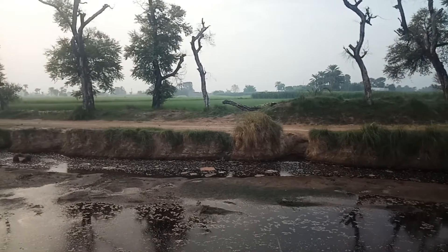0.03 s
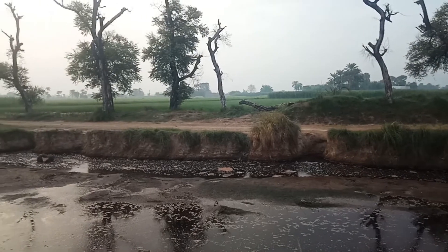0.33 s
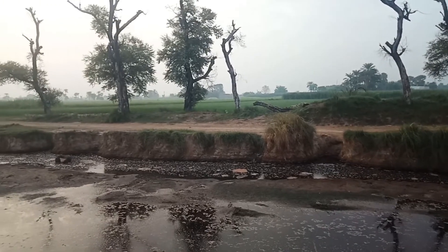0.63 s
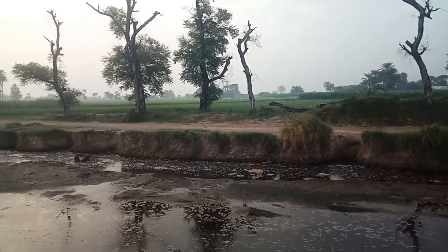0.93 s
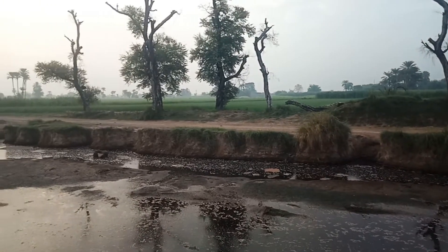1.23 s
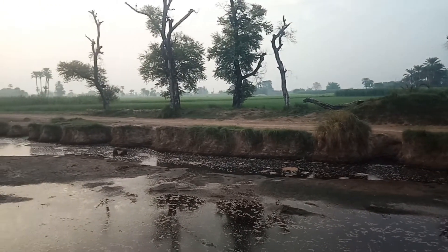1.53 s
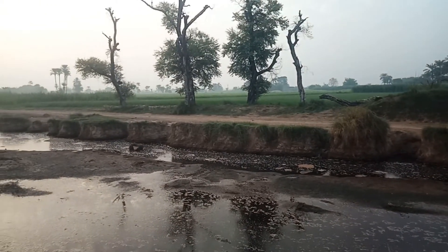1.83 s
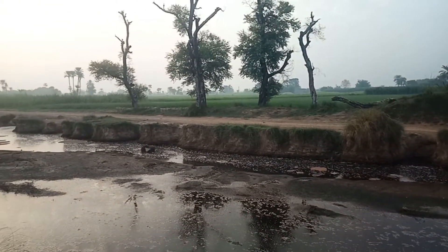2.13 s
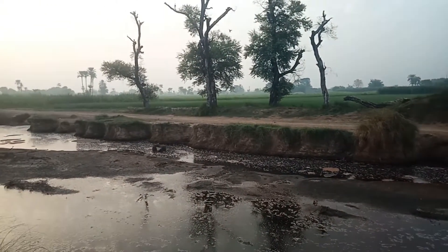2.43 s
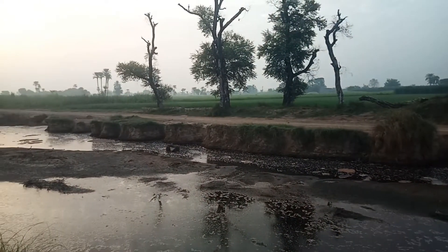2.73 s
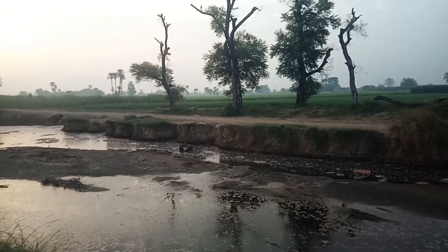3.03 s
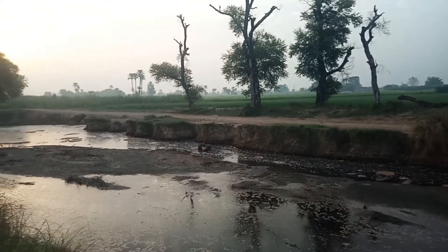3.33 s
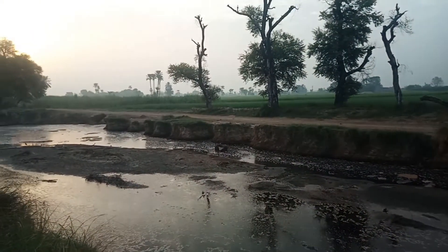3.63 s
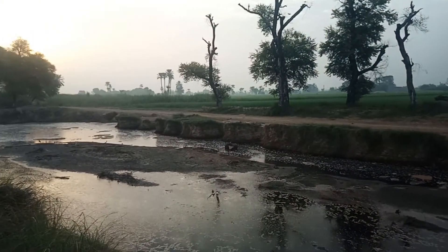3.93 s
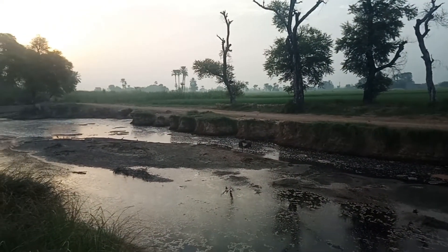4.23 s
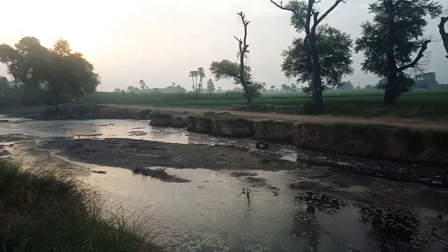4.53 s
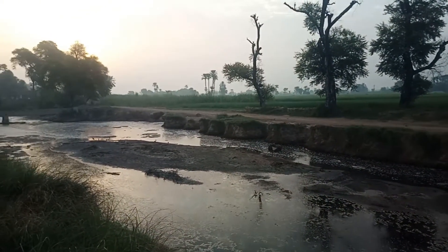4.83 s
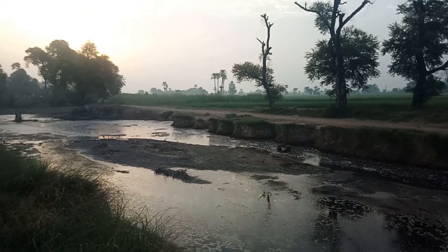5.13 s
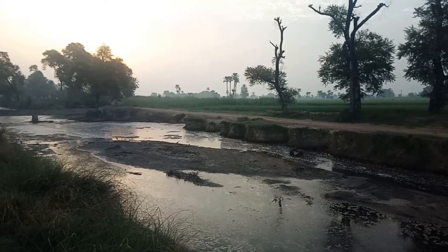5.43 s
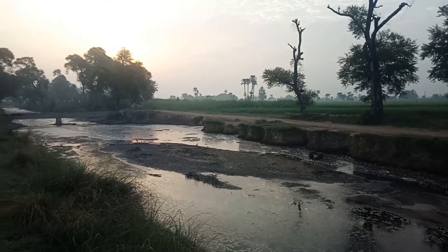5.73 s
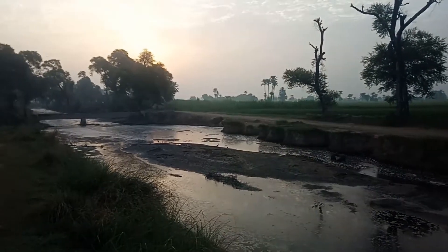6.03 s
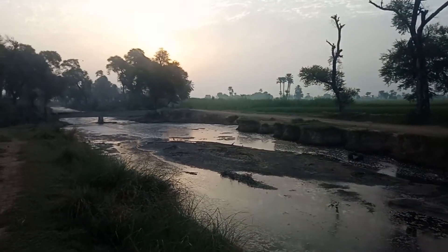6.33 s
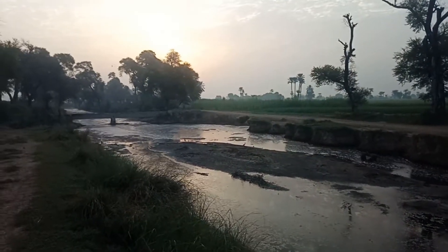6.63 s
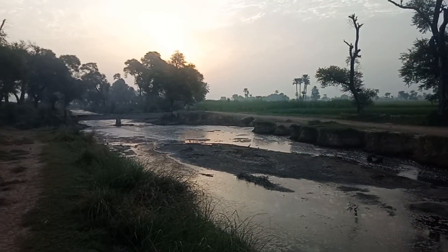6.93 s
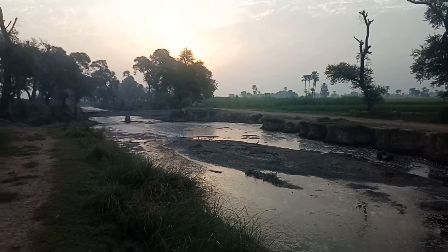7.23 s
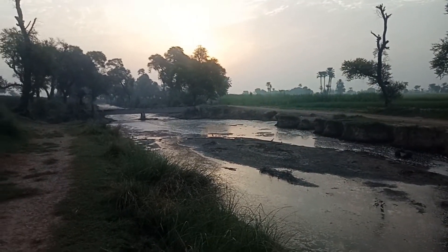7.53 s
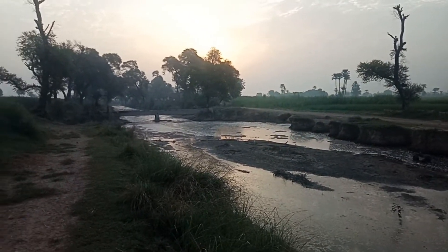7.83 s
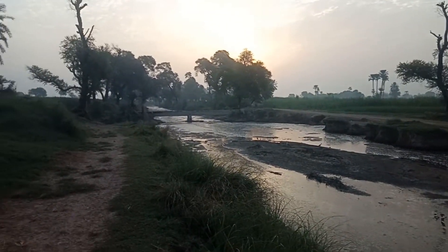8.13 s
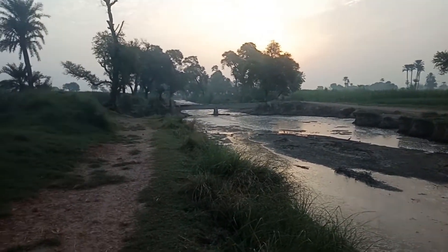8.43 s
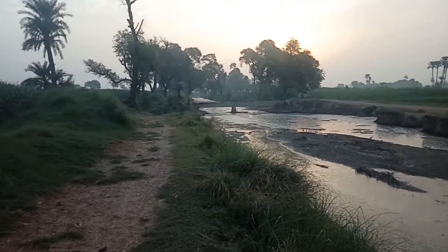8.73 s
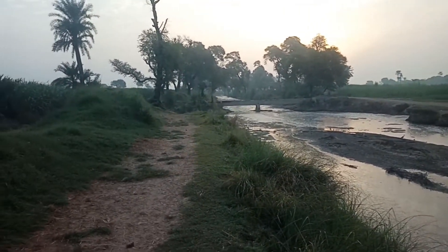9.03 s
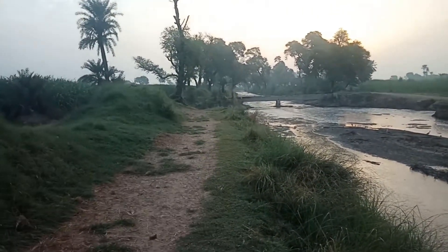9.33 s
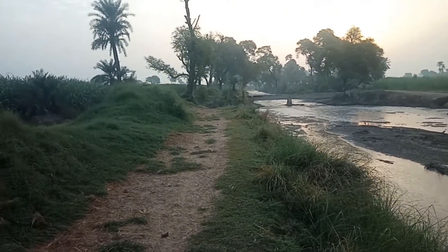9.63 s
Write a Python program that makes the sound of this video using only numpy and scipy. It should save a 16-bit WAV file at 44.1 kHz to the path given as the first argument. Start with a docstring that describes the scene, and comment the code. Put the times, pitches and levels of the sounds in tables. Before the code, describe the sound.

Small birds chirp in quiet farmland by a faintly trickling stream as two crows, one close and one distant, trade raspy caws.

```python
"""A crow caws hoarsely close to the microphone, and another answers from further off: dawn beside a
slow stream in open farmland. Each caw is a fluttering syrinx heard through the throat. Mynas whistle
and small birds chirp in the trees; bank and branches scatter the calls back. Behind them lie far
chatter and hoots, bubbles in the shallows, a low regular thud and a soft country hush.
One microphone takes it all, and the recorder's noise suppressor turns it down when the birds pause."""
import sys
import numpy as np
from scipy import signal
from scipy.fft import rfft, irfft
from scipy.io import wavfile
from scipy.ndimage import uniform_filter1d

SR = 44100
rng = np.random.default_rng(int(sys.argv[2]) if len(sys.argv) > 2 else 0)


def materialize(psi):
    """Save the field psi as 16-bit PCM at rate SR to the path in sys.argv[1].

    A 1-D psi becomes a single channel; in a 2-D psi each row is a channel.
    """
    bounded = np.clip(np.atleast_2d(psi).T, -1, 1)
    quanta = np.round(bounded * 32767).astype(np.int16)
    wavfile.write(sys.argv[1], SR, quanta)


N = 436149
TIME = np.arange(N) / SR

# caws of the crow by the microphone and of the one further off:
# (time [s], length [s], pitch [Hz], throat brightness [ratio], level [dB], windpipe gain [dB])
NEAR_CROW_CAWS = [(-.185, 0.31, 418, 0.97, -40.5, -25), (4.01, .31, 427.7, 1.062, -32.5, -22.5),
                  (4.866, 0.31, 414.5, 1.008, -32.5, -18), (5.604, 0.31, 421, 1.027, -32, -20)]
FAR_CROW_CAWS = [(.36, 0.3, 448.6, 1.08, -59, -32), (.815, 0.48, 448.8, 1.077, -38.5, -43),
                 (3.47, 0.45, 444.8, 1.063, -40, -29), (4.5, 0.46, 435.2, 1.066, -43, -28),
                 (6.26, 0.44, 438.2, 1.1, -41.5, -20.5), (7.02, .11, 442, 1.11, -40.5, -23),
                 (7.19, 0.087, 427.6, 1.03, -46, -24), (7.775, .22, 434.6, 1.06, -48, -39)]
# course of one caw: (position [share of length], pitch [ratio], beak opening [ratio], gain [dB],
# flutter depth [factor], raggedness [0-1])
NEAR_CAW_COURSE = [(0, .78, .76, -33, 0.7, 0.91), (0.102, .87, 0.8, -11.5, 1, 0.93),
                   (0.219, .94, 0.93, -2.5, 1.2, 0.7), (.36, 0.97, 0.97, -0.5, 1.2, 0.4),
                   (.52, 1, 0.98, 0.5, 1.1, 0), (0.701, 0.92, 0.95, -2, 1.07, 0.5),
                   (.82, .92, 0.97, -2, 0.92, .15), (.89, .76, 0.88, -11, 0.5, 0.2),
                   (1, 0.5, 0.58, -37.5, 0, 0.6)]
FAR_CAW_COURSE = [(0, .88, .92, -24, 1, .9), (.08, .95, .97, -8.5, 1, .5), (.2, 1.06, 1, -4, 1, .1),
                  (.45, 1.05, 0.88, -5.5, 1, 0.11), (.75, .93, .98, -5, 1, .2),
                  (.88, 0.88, .96, -10, 1, 0.55), (0.999, 0.7, 0.93, -16, 0.93, 0.42)]
# crow's throat resonances, which move with the beak opening: (frequency [Hz], gain [dB])
THROAT_RESPONSE = [(380, -38), (600, -29), (830, -19.5), (1040, -16), (1270, -10.5), (1480, -11.5),
                   (1800, 3.5), (2020, 3), (2280, -6), (2750, -33), (3600, -65.5), (6000, -90)]
# steady upper resonance of its windpipe: (frequency [Hz], gain [dB])
WINDPIPE_RESPONSE = [(2000, -50), (2900, -14), (3400, -13), (4050, 0), (4450, -3), (5000, -21), (5800, -31),
                     (7000, -41), (14000, -49)]
# sagging and rising myna notes: (time [s], length [s], pitch [Hz], level [dB], trill depth [0-1])
MYNA_SAGGING_NOTES = [(.875, 0.097, 1385, -52.5, .64), (1.055, 0.27, 1274, -48.5, .15),
                      (1.375, 0.062, 1123, -51, 0.3), (1.566, 0.06, 1225, -54, 0.1),
                      (2.123, 0.026, 1345, -45, .1), (2.152, 0.052, 1310, -41.5, 0),
                      (2.313, 0.1, 1255, -46.5, 0.57), (2.41, 0.13, 1110, -56, 1),
                      (2.735, 0.06, 1380, -53.5, 0), (2.852, .11, 1320, -58, 0.28),
                      (4.445, .089, 1398, -45, 0.17), (4.619, 0.11, 1324, -51.5, 0.2),
                      (6.49, .13, 1343, -60.5, 0.71), (8.025, 0.089, 1266, -57.5, .6),
                      (8.17, 0.064, 1426, -54, 0.24), (8.289, 0.121, 1350, -53, 0.43),
                      (8.559, 0.071, 1214, -51, 0.5), (8.71, 0.027, 1154, -53, .1),
                      (9.722, 0.022, 1242, -49.5, 0.4)]
MYNA_RISING_NOTES = [(2.204, 0.062, 1307, -61.5, .3), (2.65, .09, 1314, -55.5, 0.051),
                     (2.783, 0.054, 1299, -43.5, 0.12), (2.814, 0.036, 1391, -40.5, 0.28),
                     (7.133, .085, 1277, -53, 0.18), (7.269, 0.0398, 1254, -47.5, 0.37),
                     (7.3, .045, 1476, -45, .3), (8.397, .08, 1394, -51, .5)]
# small birds in the trees, by kind of call: (time [s], length [s], pitch [Hz], level [dB])
SMALL_BIRD_CALLS = { "slur": [(.113, 0.084, 3816, -56), (.275, .06, 3524, -54), (.732, .035, 3080, -52.5),
                    (.874, .1, 4060, -55.5), (1, .075, 3930, -49.5), (1.41, .035, 3000, -55),
                    (1.825, .052, 2995, -56), (1.878, .068, 3170, -57), (2.82, 0.057, 4140, -58),
                    (3.02, 0.074, 4050, -52), (3.26, .07, 4050, -56), (3.384, .035, 3235, -51.5),
                    (3.489, .095, 3890, -58.5), (3.604, .031, 3575, -53), (3.661, .035, 5060, -54),
                    (3.73, .11, 3880, -55), (3.836, .05, 5120, -56), (3.966, .094, 3840, -60.5),
                    (4.23, 0.054, 3730, -52.5), (4.371, .054, 3900, -57.5), (5.22, .15, 3500, -68)],
                    "fall": [(.932, 0.028, 2570, -45), (.316, .017, 3300, -53), (1.455, 0.03, 3400, -56),
                    (2.398, .064, 3307, -54.5), (3.433, 0.031, 3190, -52), (3.552, 0.037, 3170, -52.5),
                    (3.784, 0.026, 3366, -51), (8.168, .063, 5130, -63), (8.532, .098, 3590, -61),
                    (9.025, 0.13, 3300, -66), (9.444, .09, 3980, -69), (9.744, 0.074, 2910, -56)],
                    "pip": [(.01, 0.04, 3060, -47), (1.186, .012, 3180, -43.5), (1.53, .036, 2896, -52.5),
                    (1.53, 0.053, 1350, -60), (2.672, 0.076, 5330, -65.5), (6.588, 0.017, 4760, -56.5),
                    (6.637, 0.028, 3810, -47.5), (6.735, 0.024, 3760, -49), (6.926, 0.0259, 3385, -43),
                    (6.961, 0.024, 3613, -46.5), (7.128, 0.099, 5026, -59), (7.845, 0.011, 3290, -57),
                    (7.902, 0.021, 3670, -58.5)], "scold": [(2.484, 0.038, 3250, -50.5),
                    (3.906, 0.07, 2606, -46), (3.976, 0.037, 2840, -43.5), (4.034, 0.057, 5550, -64.5),
                    (4.177, 0.052, 2677, -43), (4.254, 0.032, 2875, -45), (4.315, 0.036, 5010, -58.5),
                    (7.925, 0.019, 5060, -60.5), (8.216, .053, 2750, -50), (8.218, 0.078, 3980, -51),
                    (8.39, .08, 4230, -57.5), (8.433, 0.06, 5600, -65), (8.617, 0.15, 3165, -56),
                    (8.698, 0.078, 5560, -66.5)], "tweet": [(2.456, 0.027, 3170, -45.5),
                    (2.528, 0.027, 3140, -42), (6.661, 0.032, 3290, -44.5), (6.755, 0.028, 3244, -44),
                    (6.999, 0.037, 3332, -43.5), (7.979, 0.024, 3420, -48.5)],
                    "dive": [(2.9, 0.075, 3940, -49), (3.001, 0.061, 3900, -45.5), (3.1, 0.065, 4030, -48),
                    (3.221, 0.071, 3966, -50.5), (7.396, .06, 3877, -39), (7.486, 0.058, 3880, -40),
                    (7.584, .059, 3910, -42), (7.685, 0.049, 4160, -68)],
                    "squeak": [(9.689, .06, 3300, -43)]}
# strokes that make up each kind of call: (delay [call lengths], length [call lengths],
# start pitch [ratio], middle pitch [ratio], end pitch [ratio], gain [dB], rasp [0-1])
CALL_STROKES = {"slur": [(0, .72, 0.97, 1, 0.95, -0.89, .03), (.62, .4, 1, .93, .81, 0, .05)],
                "fall": [(0.0015, 1, 1, 0.96, .79, 0.011, 0.31)],
                "pip": [(0.0018, 0.93, .95, 0.99, 1.06, 0, 0.34)],
                "scold": [(0, 0.99, 0.94, 0.98, 1.01, 0, .9)], "tweet": [(0, 1, .74, 1.1, 1.25, -0.5, .3),
                (.9, 1.92, 1.18, 1.25, 1.27, -12, .55)], "dive": [(0, .3, 1.68, 1.58, 1.31, -30.5, 0.56),
                (.33, .36, 1.33, 1.18, .96, -7, 0.52), (.74, .24, 1.18, 1, .85, 0, 0.86),
                (.9, .6, 0.49, .99, .99, -10, .65)], "squeak": [(0, .65, .99, 1, 0.976, 1, 0.026),
                (.05, 0.96, .91, 1.01, .97, -7, 0.96), (.07, .75, .65, .64, .62, -22, .35),
                (.18, 1, 1.26, 1.2, 1.11, -15, .8)]}
# bouts of chatter in the far trees: (time [s], length [s], level [dB])
CHATTER_BOUTS = [(0, 0.64, -64.5), (0.802, .72, -61), (2.128, 1.11, -58), (3.419, 1.84, -60.5),
                 (5.222, 0.37, -68), (6.3, 1.42, -55.5), (7.821, .9, -58), (9.706, .18, -57.5)]
# hoots from across the fields: (time [s], length [s], pitch [Hz], level [dB])
FIELD_HOOTS = [(0, 0.56, 530, -70), (.95, .15, 526, -72), (5.15, 0.342, 541, -74), (7.093, 0.47, 550, -72)]
# pace of the low thuds: (time [s], rate [thuds/s])
THUD_RATE = [(0, 7.808), (1, 7.91), (2.5, 7.632), (3.5, 7.697), (5, 7.915), (7.5, 7.948), (9.9, 7.655)]
# hush of the open farmland: (frequency [Hz], relative density [dB])
HUSH_SPECTRUM = [(25, -20.5), (60, 5), (100, 5.5), (150, 1), (280, 2), (500, -5.5), (900, -3), (1500, -3),
                 (2500, -0.5), (4000, -11), (5200, -23.5), (7000, -28), (15000, -27)]
# recorder's noise suppressor: (level in the birds' band [dB], gain [dB])
SUPPRESSOR_CURVE = [(-63.5, -15.5), (-61.5, -9), (-57, -4.5), (-53.5, -1.12), (-41.5, 1), (-32, 3.5)]


def crow(caws, course, flutter_hz, swing, throb, jitter, rasp_db):
    """Syrinx harmonics pass the throat; a fast flutter in pitch and level makes the caw hoarse."""
    out = np.zeros(N)
    share, *columns = np.transpose(course)
    for start, length, pitch_hz, brightness, level_db, windpipe_db in caws:
        size = int(length * SR)
        position = np.linspace(0, 1, size)
        ratio, opening, course_db, depth, ragged = (np.interp(position, share, c) for c in columns)
        flutter = phase_of(flutter_hz * ratio * (1 + .04 * wander(60, size)))
        # the voice starts ragged, settles, and drops at the end
        wobble = 1 + depth * swing * np.sin(flutter) + ragged * jitter * wander(700, size)
        phase = phase_of(pitch_hz * ratio * wobble)
        # as the flutter dies the syrinx relaxes and low harmonics take over
        tilt = 3.7 * (1 - np.clip(depth, 0, 1))
        syrinx = sum((k / 4) ** -tilt * np.sin(k * phase + rng.uniform(0, 2 * np.pi))
                     for k in range(2, 26))
        rasp = from_db(rasp_db) * rng.standard_normal(size)
        voice = through_throat(syrinx + rasp, opening * brightness, windpipe_db)
        voice /= np.sqrt(uniform_filter1d(voice ** 2, size=500) + 1e-12)  # even out the level
        pulsing = 1 + depth * throb * np.cos(flutter)
        add(out, start, overblown(voice) * pulsing * from_db(level_db + course_db))
    return out


def through_throat(source, opening, windpipe_db):
    """The moving throat resonances and the steady windpipe one colour the voice."""
    hz, t, frames = signal.stft(source, SR, nperseg=512)
    scale = np.interp(t * SR, np.arange(len(source)), opening)
    throat = gain_at(THROAT_RESPONSE, hz[:, None] / scale)
    windpipe = from_db(windpipe_db) * gain_at(WINDPIPE_RESPONSE, hz[:, None])
    return signal.istft(frames * (throat + windpipe), SR)[1][:len(source)]


def overblown(voice, bite_db=-21):
    """A hard-driven voice doubles its main resonance an octave higher."""
    octave = band_pass(voice ** 2, 3300, 4700)
    return voice + from_db(bite_db) * rms_one(octave)


def mynas(notes, arc, harmonics_db, trill_hz, jitter):
    """Reedy notes led by the second harmonic, some trilled; arc is the start and end pitch ratio."""
    out = np.zeros(N)
    for start, length, pitch_hz, level_db, trill_depth in notes:
        hz, envelope = glide(length, arc[0] * pitch_hz, pitch_hz, arc[1] * pitch_hz, edge=.052)
        size = len(hz)
        phase = phase_of(hz * (1 + jitter * wander(400, size)))
        voice = sum(from_db(db) * treble_loss(k * hz) * np.sin(k * phase)
                    for k, db in enumerate(harmonics_db, start=1))
        trill = 1 + trill_depth * np.sin(phase_of(trill_hz * (1 + .2 * wander(45, size))))
        swell = .5 + np.hanning(size)
        waver = 1 + .18 * wander(180, size)
        add(out, start, from_db(level_db) * rms_one(voice * trill * swell * waver) * envelope)
    return out


def small_birds(rasp_swing, rasp_hz, octave_db):
    """Nearly pure sweeps from the trees; in raspy ones pitch and level shake irregularly."""
    out = np.zeros(N)
    for start, length, arc_hz, level_db, rasp in strokes():
        hz, envelope = glide(length, *arc_hz, edge=.12)
        phase = phase_of(hz * (1 + rasp * rasp_swing * wander(rasp_hz, len(hz))))
        tone = np.sin(phase) + from_db(octave_db) * np.sin(2 * phase)
        shake = 1 + .74 * rasp * wander(300, len(hz))
        add(out, start, from_db(level_db) * rms_one(tone * shake * treble_loss(hz)) * envelope)
    return out


def strokes():
    """Each small-bird call is its kind's strokes, stretched and transposed."""
    for kind, calls in SMALL_BIRD_CALLS.items():
        for start, length, hz, level_db in calls:
            for delay, share, first, middle, last, stroke_db, rasp in CALL_STROKES[kind]:
                arc_hz = (first * hz, middle * hz, last * hz)
                yield start + delay * length, share * length, arc_hz, level_db + stroke_db, rasp


def treble_loss(hz, corner_hz=4500, steepness=14):
    """High notes arrive dulled: air and microphone lose treble above about 4.5 kHz."""
    return 1 / np.sqrt(1 + np.abs(hz / corner_hz) ** steepness)


def far_flock(notes_per_s, spread_db):
    """Faint scratchy chatter from distant trees, in bouts of loosely spaced notes."""
    out = np.zeros(N)
    for start, bout_s, level_db in CHATTER_BOUTS:
        slots = np.arange(start, start + bout_s, 1 / notes_per_s)
        for slot, (late, length, pitch, slope, faintness) in zip(slots, rng.random((128, 5))):
            hz = 2100 + 2000 * pitch
            bend = .33 * (slope - .5)
            length_s = .018 + .04 * length
            arc, envelope = glide(length_s, hz * (1 - bend), hz * 1.03, hz * (1 + bend), edge=.4)
            tone = np.sin(phase_of(arc * (1 + .025 * wander(600, len(arc)))))
            add(out, slot + late / notes_per_s, from_db(level_db - spread_db * faintness) * envelope * tone)
    return out


def far_hoots():
    """Soft wavering tones from across the fields."""
    out = np.zeros(N)
    for start, length, pitch_hz, level_db in FIELD_HOOTS:
        hz, envelope = glide(length, pitch_hz, pitch_hz, pitch_hz, edge=.068)
        tone = np.sin(phase_of(hz * (1 + .025 * wander(60, len(hz)))))
        waver = 1 + .4 * wander(25, len(hz))
        add(out, start, from_db(level_db) * rms_one(tone * waver) * envelope)
    return out


def trickle(level_db, spread_db, decay_cycles, count):
    """Tiny bubbles in the shallows, each a short rising ring."""
    out = np.zeros(N)
    t = TIME[:SR // 25]
    for when, pitch, faintness in rng.random((count, 3)):
        hz = 400 * 5 ** pitch
        ring = np.sin(2 * np.pi * hz * t * (1 + 2 * t))
        envelope = np.exp(-t * hz / decay_cycles) * (1 - np.exp(-t * hz))
        add(out, when * N / SR, from_db(level_db - spread_db * np.sqrt(faintness)) * ring * envelope)
    return out


def thuds(pitch_hz, width_s, level_db, spread_db, first_turn):
    """Soft bass thumps about eight times a second, perhaps a far irrigation pump."""
    out = np.zeros(N)
    t = np.arange(-SR // 20, SR // 20) / SR
    envelope = np.exp(-(t / width_s) ** 2)
    turns = np.cumsum(np.interp(TIME, *np.transpose(THUD_RATE))) / SR
    beats = np.interp(np.arange(first_turn, turns[-1]), turns, TIME)  # one thud a turn
    for beat, (detune, offset, strength) in zip(beats, rng.standard_normal((len(beats), 3))):
        tone = np.sin(2 * np.pi * (pitch_hz * (1 + .027 * detune) * t + offset))
        add(out, beat + t[0], from_db(level_db + spread_db * strength) * envelope * tone)
    return out


def country_hush(level_db):
    """Soft noise of the open land all round the microphone; its level flickers slightly."""
    spectrum = rfft(rng.standard_normal(N)) * gain_at(HUSH_SPECTRUM, np.fft.rfftfreq(N, 1 / SR))
    flicker_db = .9 * wander(12, N) + wander(45, N)
    return from_db(level_db + flicker_db) * rms_one(irfft(spectrum, N))


def scatter(x, early_db, early_t60, late_db, late_t60):
    """Direct sound, sparse echoes off bank and branches, then a tail from the far trees (t60 in s)."""
    t = TIME[:SR]
    reflections = rng.standard_normal(SR) * (rng.random(SR) < 900 / SR)  # about 900 a second
    early = reflections * (t > .004) * from_db(-60 * t / early_t60)
    late = rng.standard_normal(SR) * (t > .03) * from_db(-60 * t / late_t60)
    echoes = (from_db(early_db) * rms_one(early) + from_db(late_db) * rms_one(late)) / np.sqrt(SR)
    return x + signal.fftconvolve(x, echoes)[:N]


def suppress_noise(x, fall_db_per_s):
    """The recorder's gain follows the birds' band: it opens fast for a call and sinks in the pauses."""
    band = band_pass(x[0], 1000, 6000)
    level_db = 10 * np.log10(np.abs(uniform_filter1d(band ** 2, size=1300)) + 1e-12)
    fall = fall_db_per_s * TIME
    held_db = np.maximum.accumulate(level_db + fall) - fall
    gain_db = np.interp(held_db, *np.transpose(SUPPRESSOR_CURVE))
    return x * from_db(uniform_filter1d(gain_db, size=1700))


def from_db(db):
    """Decibels to gain."""
    return 10 ** (np.asarray(db) / 20)


def rms_one(x):
    """Scale to unit power."""
    return x / np.sqrt(np.mean(x ** 2) + 1e-20)


def gain_at(spectrum, hz):
    """Gain of a (frequency [Hz], gain [dB]) table on a log-frequency axis."""
    points, db = np.transpose(spectrum)
    return from_db(np.interp(np.log(hz + 1), np.log(points), db))


def band_pass(x, low_hz, high_hz):
    """Keep one band, with gentle slopes."""
    return signal.sosfilt(signal.butter(2, [low_hz, high_hz], "band", fs=SR, output="sos"), x)


def wander(rate_hz, size):
    """Smooth random motion with a spread near 1."""
    steps = np.arange(size) * rate_hz / SR
    return np.interp(steps, np.arange(4096), rng.standard_normal(4096))


def phase_of(hz):
    """Running phase of a changing frequency."""
    return 2 * np.pi * np.cumsum(hz) / SR


def glide(length_s, start_hz, middle_hz, end_hz, edge):
    """Pitch arc through three points, and an envelope whose fades each take the share `edge`."""
    u = np.linspace(0, 1, int(length_s * SR))
    hz = np.polyval(np.polyfit([0, .5, 1], [start_hz, middle_hz, end_hz], 2), u)
    fade = np.clip(np.minimum(u, 1 - u) / edge, 0, 1)
    return hz, np.sin(np.pi / 2 * fade) ** 2


def add(track, start_s, sound):
    """Mix a sound into the track at its time."""
    at = int(round(start_s * SR))
    sound = sound[max(-at, 0):max(N - at, 0)]
    track[max(at, 0):max(at, 0) + len(sound)] += sound


def scene():
    """What reaches the microphone by the stream: birds at their distances over the hush."""
    near = crow(NEAR_CROW_CAWS, NEAR_CAW_COURSE,
                flutter_hz=68, swing=.08, throb=.22, jitter=.06, rasp_db=-11)
    far = crow(FAR_CROW_CAWS, FAR_CAW_COURSE, flutter_hz=75, swing=.07, throb=.2, jitter=.05, rasp_db=-5)
    near = scatter(near, early_db=-10.5, early_t60=.17, late_db=-34.5, late_t60=.36)
    far = scatter(far, early_db=-8.5, early_t60=.21, late_db=-10, late_t60=1.0)
    whistles = mynas(MYNA_SAGGING_NOTES, arc=(1.02, .93), harmonics_db=[-23, 6, -9, -18, -26.5],
                     trill_hz=75.42, jitter=.014)
    whistles += mynas(MYNA_RISING_NOTES, arc=(.9, 1.08), harmonics_db=[-29, 7.5, -16.5, -22, -20],
                      trill_hz=77, jitter=.02)
    chirps = small_birds(rasp_swing=.075, rasp_hz=1100, octave_db=-48)
    whistles = scatter(whistles, early_db=-8.5, early_t60=.45, late_db=-11, late_t60=.54)
    chirps = scatter(chirps, early_db=-5.5, early_t60=.17, late_db=-14.5, late_t60=.73)
    flock = far_flock(notes_per_s=36, spread_db=11.5)
    flock = scatter(flock, early_db=7, early_t60=.2, late_db=-10, late_t60=.45)  # mostly echo
    hush = country_hush(level_db=-61.5)
    stream = trickle(level_db=-53, spread_db=14, decay_cycles=5.6, count=600)
    background = hush + stream + flock + far_hoots()
    background += thuds(pitch_hz=80, width_s=.014, level_db=-57, spread_db=2.5, first_turn=.655)
    return (near + far + whistles + chirps + background)[None]


def record(dry):
    """The recorder turns the pauses down and cuts steeply above 15.5 kHz."""
    top_cut = signal.ellip(10, .1, 70, 15500, fs=SR, output="sos")
    return signal.sosfilt(top_cut, suppress_noise(dry, fall_db_per_s=119))


dry = scene()
out = record(dry)
materialize(out)
```